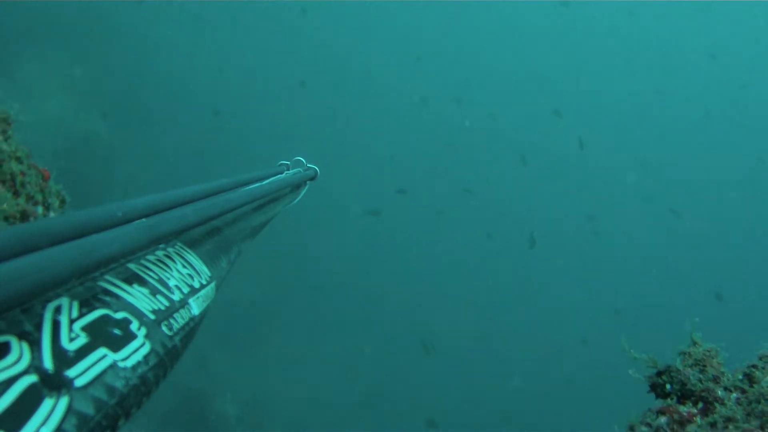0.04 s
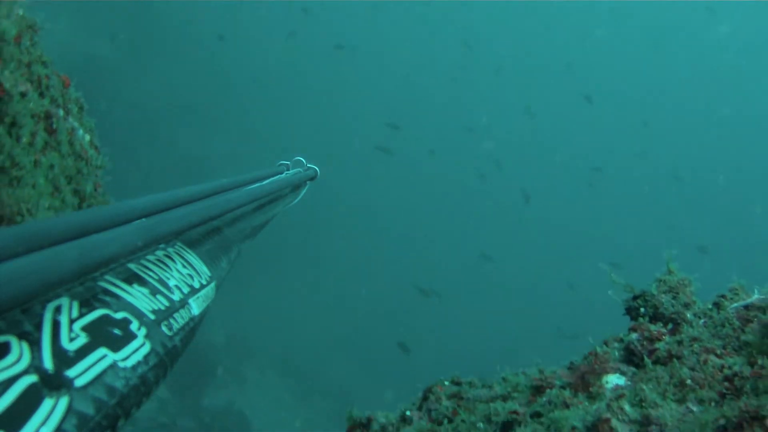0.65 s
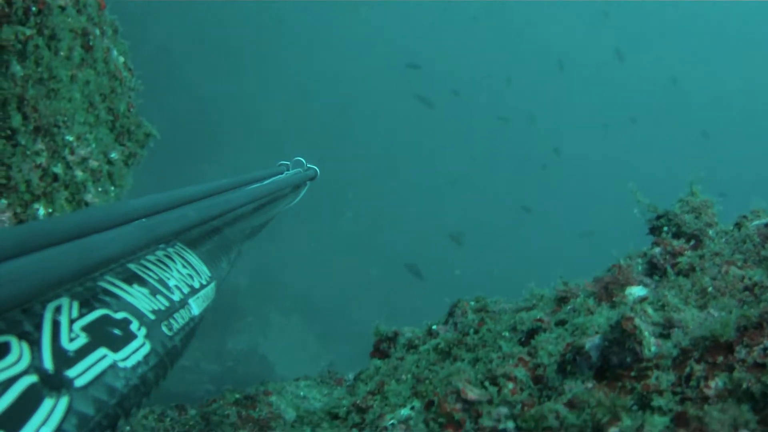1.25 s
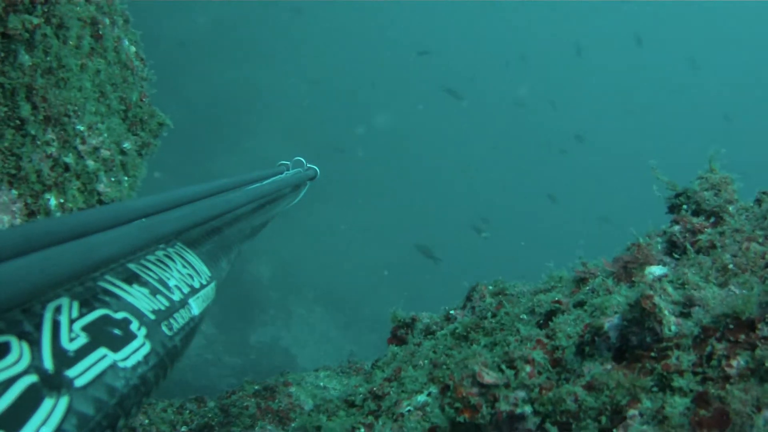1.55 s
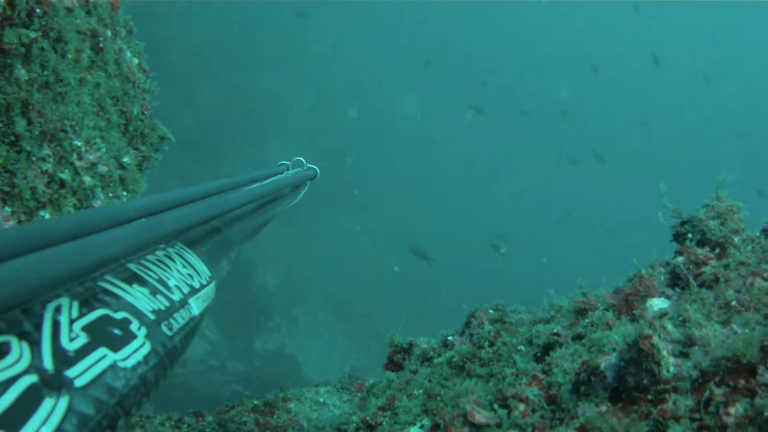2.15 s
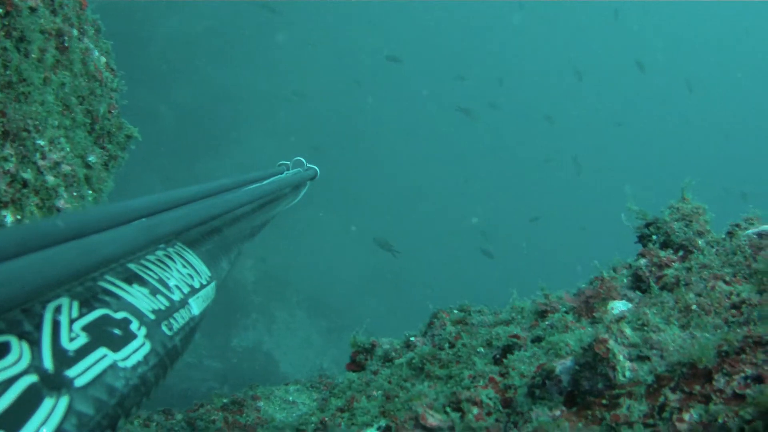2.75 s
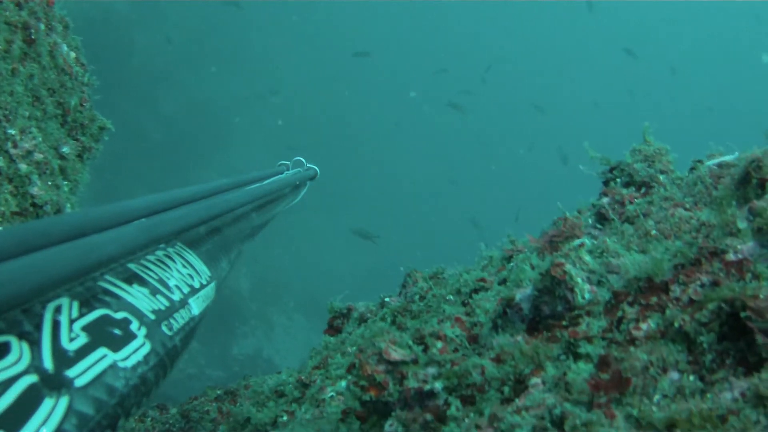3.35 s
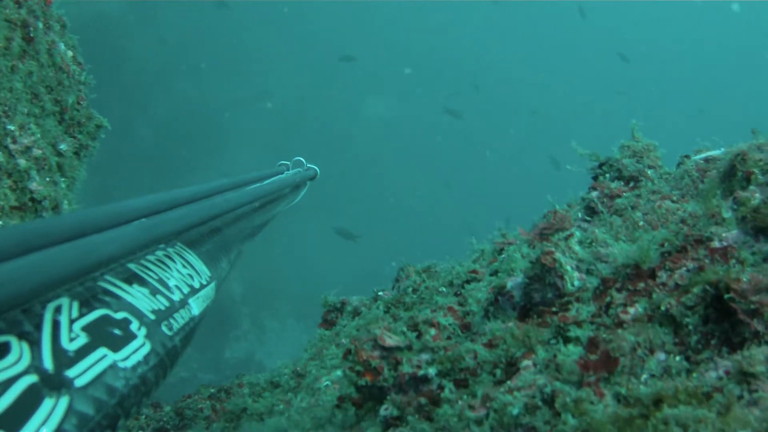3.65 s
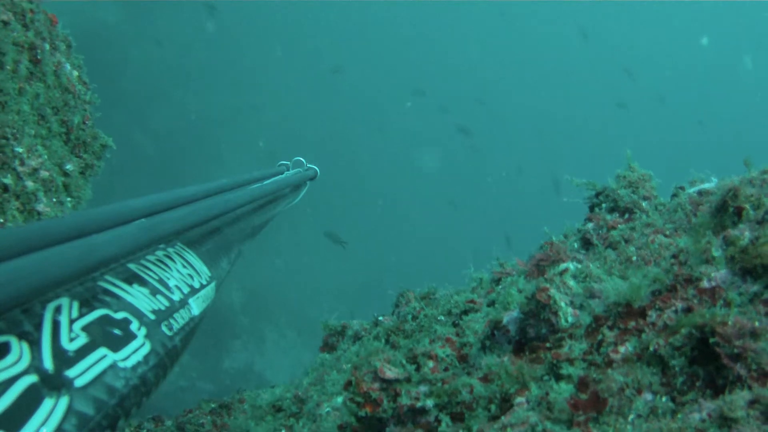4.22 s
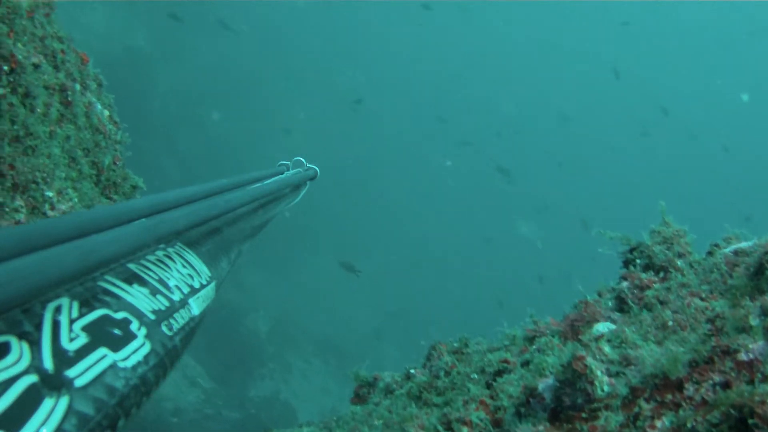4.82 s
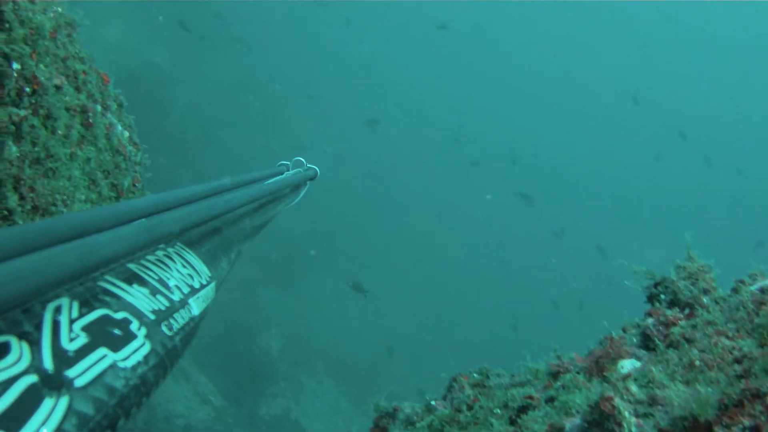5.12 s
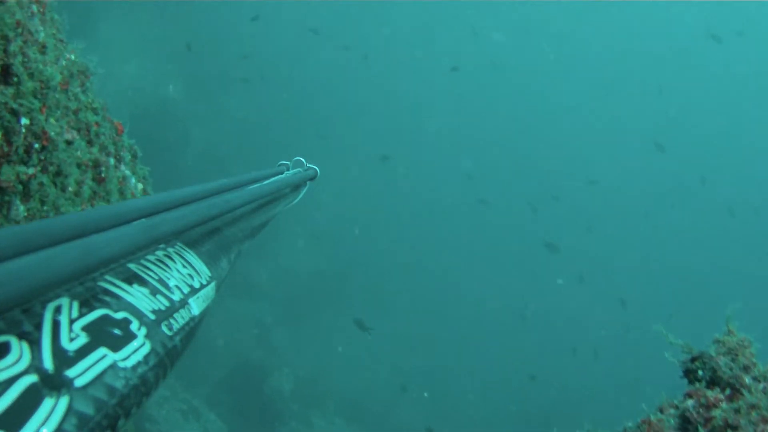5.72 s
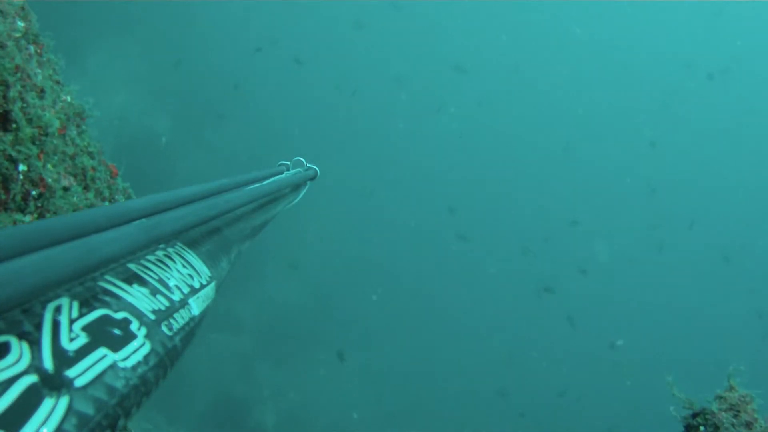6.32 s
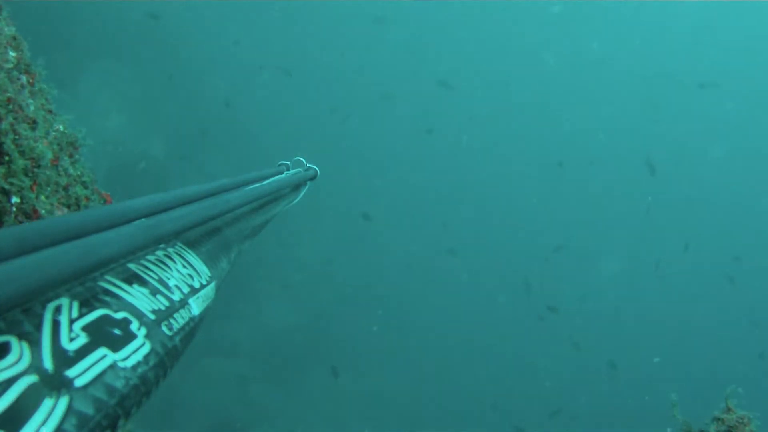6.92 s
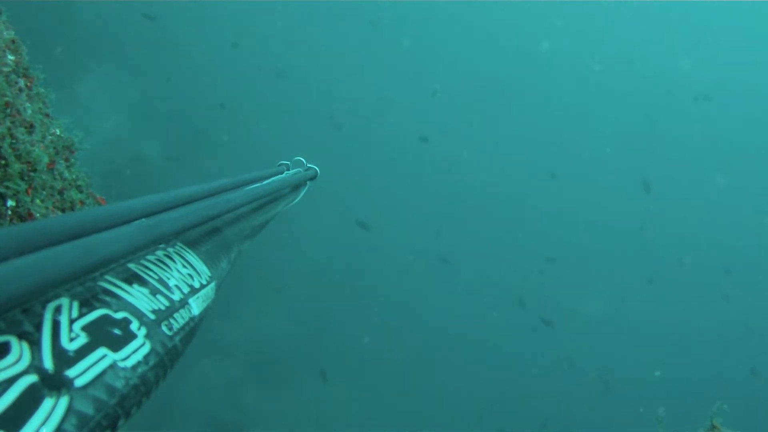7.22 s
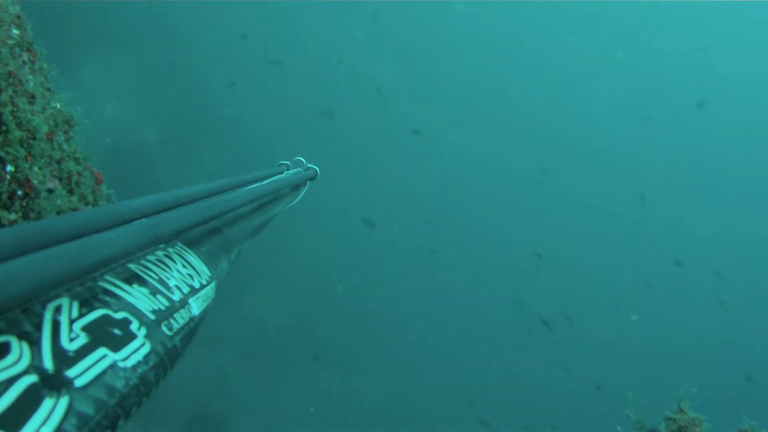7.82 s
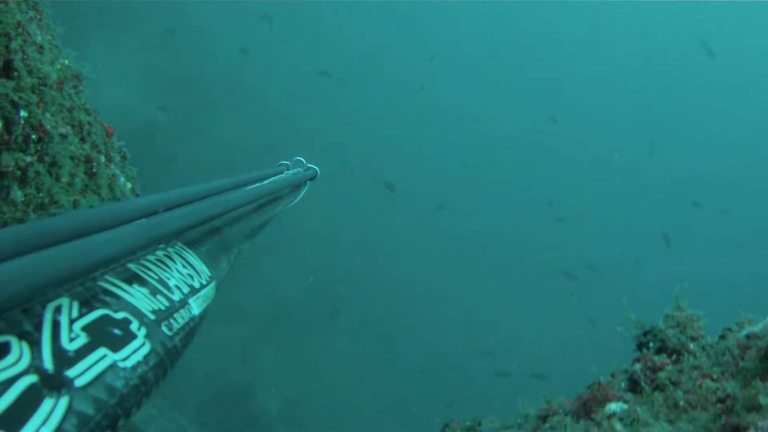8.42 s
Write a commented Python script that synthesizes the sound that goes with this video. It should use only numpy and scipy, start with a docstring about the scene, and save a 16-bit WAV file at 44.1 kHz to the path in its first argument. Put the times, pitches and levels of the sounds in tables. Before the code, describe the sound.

A dense sizzle of distant shrimp runs throughout, heard in the sea through a camera's watertight case. Close snaps click unevenly on top, loudest just after the start and about three seconds in, each ringing the case slightly. Water gurgles softly near the middle and again later, and the case takes a few light, dull knocks. A low sea wash and a barely audible electronic hiss and whine stay behind.

```python
"""Under the sea over a rocky reef, with the microphone inside a camera's watertight housing.
Snapping shrimp crackle near and far: each snap scatters off the rocks and rings the housing.
Water gurgles softly now and then over the low wash of the sea, and the housing takes a few dull bumps.
Behind it all, the camera's electronics hiss and whine."""
import sys
import numpy as np
from scipy import signal
from scipy.fft import rfft, irfft, next_fast_len
from scipy.io import wavfile
from scipy.ndimage import map_coordinates

SR = 44100
rng = np.random.default_rng(int(sys.argv[2]) if len(sys.argv) > 2 else 0)


def master(y):
    """Save y as 16-bit WAV."""
    cut = np.clip(np.atleast_2d(y).T, -1, 1)
    pcm = np.round(cut * 32767)  # scale
    wavfile.write(sys.argv[1], SR, pcm.astype(np.int16))


N = 377496
SNAP_SAMPLES = 4096
REEF_T60 = 0.055  # seconds for a close snap's echoes to fall 60 dB

# The loudest snaps, from shrimp near the housing.
# Each row: time in seconds, then relative level, treble and low ring, all in dB.
NEAR_SNAPS = [(0.3112, -25.5, -7, 4), (0.319, -23.5, 4, 4.5), (0.3408, -25.5, 5.5, 0),
              (0.566, -35, -16, -9), (0.617, -28.5, 2, 4), (0.671, -30.5, 5, 11), (0.827, -33, 11, 0),
              (0.9871, -30, -18, 2), (1.3839, -31.5, 5, -9), (1.464, -33.5, -9, -2), (1.662, -27, 3.5, 2),
              (1.9982, -31.5, 1, 6), (2.0887, -27.5, -27, 8.5), (2.47, -32.5, 9.5, -8),
              (2.794, -31.5, 6, -10), (2.8587, -30.5, -2, 2), (3.0593, -31.5, 1, -18), (3.097, -30, 2, -8),
              (3.128, -32, -24, -8), (3.176, -20.5, -14, 9.5), (3.1887, -31, 5, 4),
              (3.3665, -22.5, -0.5, -3), (3.526, -34.5, -4, -2), (3.64, -31.5, 10, -11),
              (3.686, -31, 3, -12), (3.7446, -27.5, -14, 0), (3.7545, -31, -6, -2), (4.2122, -35.5, 14, -8),
              (4.224, -27.5, -5, -6), (4.529, -28, -7, 4), (4.6638, -30, -6, -3), (4.7023, -30.5, 2, -9),
              (4.8398, -31, 7, 2), (5.246, -31, -23, 5), (5.2931, -29, 4, 8), (6.7334, -25, -3, 1),
              (6.8001, -32, 7, -2), (6.8116, -32, -6, 6), (7.376, -32.5, -5, 4), (7.5282, -30, 6.5, 0),
              (7.943, -31.5, 3, -11), (8.0893, -31.5, 5, -11), (8.309, -28.5, 2, 3.5), (8.3605, -30, 6, -4)]

def near_shrimp(gain_db, treble_db, low_db):
    """Single claw snaps stand out, each with its own path off the rocks and its own colour."""
    track = np.zeros(N)
    attack_s = 0.001817  # each snap has a soft attack, swelling over about 2 ms
    for s, db, own_treble_db, own_low_db in NEAR_SNAPS:
        ring = housing_ring(treble_db + own_treble_db, low_db + own_low_db)
        echo_db = -1 - 2 * rng.standard_normal()  # the rocks' echo changes from place to place
        snap = scattered(snap_power(crack_t60=0.012, echo_db=echo_db, echo_t60=REEF_T60))
        add(track, s - attack_s, at_level(signal.fftconvolve(snap, ring), db + gain_db))
    return track

def snap_power(crack_t60, echo_db, echo_t60):
    """Power over time of one snap: a brief crack, then its echoes from the rocks."""
    t = np.arange(SNAP_SAMPLES) / SR
    crack = t ** 2 * amp(-60 * t / crack_t60) ** 2  # a soft attack, then a fast decay
    echoes = t * amp(-60 * t / echo_t60) ** 2
    return crack / crack.sum() + amp(echo_db) ** 2 * echoes / echoes.sum()

def scattered(power):
    """Sound that comes by many paths is noise with the given power over time."""
    return np.sqrt(np.abs(power)) * rng.standard_normal(len(power))

# Resonances of the housing around the microphone.
# Each row: centre in Hz, width in Hz, relative level in dB.
HOUSING_MODES = [(978.5, 45, -12), (1083, 165, -8), (1245.6, 103, -2), (1363, 23, -12.5),
                 (1563, 153, -0.06), (1699, 222, -3.5), (1888, 108, -8.5), (2204, 213, -12.5),
                 (2400, 267, -12.5), (2628, 210, -16), (3034, 320, -19), (3750, 700, -20), (4570, 530, -27),
                 (5356, 810, -26.5), (6046, 575, -29), (6840, 1040, -37.5)]

def housing_ring(treble_db, low_db):
    """The housing rings after one click; the click's colour tilts the low and high ends."""
    hz = np.fft.rfftfreq(SNAP_SAMPLES, 1 / SR)
    power = sum(amp(db) ** 2 / (1 + (2 * (hz - centre) / width) ** 2) ** 2
                for centre, width, db in HOUSING_MODES)
    colour_db = along([(600, 0), (900, low_db), (1200, low_db), (1550, 0), (1900, 0),
                       (2700, treble_db / 4 - 1), (4200, treble_db)], hz)
    wall_db = along([(7400, -2.5), (8200, -4), (8900, -20), (11000, -13.5)], hz)  # the wall dulls treble
    cepstrum = irfft(np.log(np.sqrt(power) * amp(colour_db + wall_db) + 1e-7))
    causal = np.r_[cepstrum[0], 2 * cepstrum[1:SNAP_SAMPLES // 2]]  # no ring before the click
    return irfft(np.exp(rfft(causal, SNAP_SAMPLES)))

# The clearest ticks of small shrimp close by.
# Each row: start in seconds, relative level in dB, pitch in Hz.
CLOSE_TICKS = [(0.5897, -42, 5500), (1.4405, -43, 5170), (4.611, -44, 5030), (5.177, -38.5, 3600),
               (5.678, -43, 4500), (5.92, -43, 5550), (6.36, -39, 4270), (7.7643, -38.5, 4000),
               (8.163, -43, 3840)]

def small_shrimp(gain_db, width_octaves):
    """Tiny claws give thin, dry ticks, each around its own pitch."""
    track, hz = np.zeros(N), np.fft.rfftfreq(SNAP_SAMPLES, 1 / SR)
    wall = rfft(housing_ring(treble_db=7.5, low_db=-10))
    for s, db, pitch_hz in CLOSE_TICKS:
        snap = scattered(snap_power(crack_t60=0.0082, echo_db=-11, echo_t60=REEF_T60))
        band = np.exp(-(np.log2((hz + 1) / pitch_hz) / width_octaves) ** 2)
        tick = irfft(rfft(snap) * band * wall)[:SNAP_SAMPLES // 2]
        add(track, s, at_level(tick, db + gain_db))
    return track

# The colony farther out on the reef. Each row: time in seconds, relative level in dB.
COLONY_LEVEL = [(0.0, -38), (0.48, -37.5), (0.76, -38.5), (1.29, -38), (1.64, -36), (1.88, -37.5),
                (2.86, -38.5), (2.95, -37.5), (3.19, -37.5), (4.15, -39), (4.62, -37), (7.08, -37.5),
                (7.37, -36.5), (8.1, -39.5), (8.56, -38)]

def colony(far_db, mid_db, small_db, stray_db):
    """Far snaps merge into a sizzle, closer ones crackle, small shrimp tick and stray ticks poke out."""
    level_db = np.interp(np.arange(N) / SR, *np.transpose(COLONY_LEVEL))
    level_db += 0.83 * wobble(per_s=8)  # activity comes and goes by chance
    far = crackle(per_s=1300, spread_db=1.5, crack_t60=0.0027, echo_db=3.5, treble_db=3.5, low_db=3)
    mid = crackle(per_s=110, spread_db=2.5, crack_t60=0.012, echo_db=-4, treble_db=0, low_db=-1)
    small = crackle(per_s=110, spread_db=10, crack_t60=0.0037, echo_db=-5, treble_db=19.5, low_db=-11)
    stray = crackle(per_s=10, spread_db=4, crack_t60=0.0041, echo_db=-7.5, treble_db=18.5, low_db=-7)
    distant = amp(level_db) * (amp(far_db) * far + amp(mid_db) * mid)
    return distant + amp(small_db) * small + amp(stray_db) * stray

def crackle(per_s, spread_db, crack_t60, echo_db, treble_db, low_db):
    """Snaps at random times ring the housing; their sum has rms 1."""
    fired = rng.random(N) < per_s / SR
    sizes = amp(spread_db * np.minimum(rng.standard_normal(N), 1))  # none of them is very near
    power = signal.oaconvolve(fired * sizes ** 2, snap_power(crack_t60, echo_db, echo_t60=0.097))[:N]
    return unit(signal.oaconvolve(scattered(power), housing_ring(treble_db, low_db))[:N])

# Dull bumps on the housing itself. Each row: middle in seconds, relative peak in dB, pitch in Hz.
HOUSING_BUMPS = [(1.6982, -42, 220), (3.11, -57, 172), (4.9464, -50, 190), (7.335, -55, 160)]

def bumps(gain_db):
    """A bump pushes the housing once to and fro, with no ring."""
    track, t = np.zeros(N), np.arange(N) / SR
    for s, db, hz in HOUSING_BUMPS:
        phase = 2 * np.pi * hz * (t - s)
        track += amp(db + gain_db) * phase * np.exp((1 - phase ** 2) / 2)
    return track

# Water stirring right at the housing.
# Each row: middle in seconds, relative level in dB, pitch in Hz, length in seconds.
WATER_STIRS = [(1.499, -61.5, 218, 0.13), (3.767, -51, 518, 0.1), (3.961, -54.5, 469, 0.27),
               (4.153, -54, 377, .17), (4.421, -62.5, 367, 0.26), (6.982, -54.5, 437, 0.14)]

def gurgles(gain_db, ring_cycles, pitch_spread, bubbles):
    """Each stir of the water is a cluster of short, rising bubble notes."""
    track, t = np.zeros(N), np.arange(SNAP_SAMPLES) / SR
    for s, db, pitch_hz, length in WATER_STIRS:
        cluster = np.zeros(N)
        for place, detune in zip(np.linspace(-.5, .5, bubbles), rng.standard_normal(bubbles)):
            hz = pitch_hz * np.exp(pitch_spread * detune)
            age = t * hz / ring_cycles
            rise = 1 + 0.035 * np.minimum(age, 4)
            note = age * np.exp(-2 * age) * np.sin(2 * np.pi * hz * t * rise)
            add(cluster, s - .008 + length * (place + rng.normal(0, 0.1)), note)
        track += amp(db + gain_db) * unit(cluster) * np.sqrt(length * SR / N)
    return track

# The sea all around the housing. Each row: frequency in Hz, relative level in dB.
SEA_SPECTRUM = [(10, -14), (29, -6.5), (42, -11), (60, -8.5), (85, -13), (120, -13.5), (230, -7.5),
                (310, -6), (400, -3.5), (800, -1), (1100, -6.5), (2500, -61)]

def sea_wash(level_db):
    """The sea gives a low, steady wash of noise."""
    return amp(level_db) * noise(SEA_SPECTRUM)

# Hiss from the camera itself. Each row: frequency in Hz, relative level in dB.
HISS_SPECTRUM = [(8900, -49.5), (9500, -15.5), (10900, -7), (13000, -2), (15200, 1), (16000, -39)]

def electronics(hiss_db, whine_db, whine_hz):
    """The camera's circuits add a high hiss and a thin, steady whine."""
    whine = np.sqrt(2) * np.sin(2 * np.pi * whine_hz * np.arange(N) / SR)
    return amp(hiss_db) * noise(HISS_SPECTRUM) + amp(whine_db) * whine

def amp(db):
    """Decibels to gain."""
    return 10 ** (np.asarray(db) / 20)

def unit(x):
    """Scale to rms 1."""
    return x / np.sqrt(np.mean(x ** 2) + 1e-20)

def at_level(sound, db):
    """Scale a snap so that its first 8 ms have this rms level."""
    head = sound[:round(.008 * SR)]
    return amp(db) * sound / np.sqrt(np.mean(head ** 2))

def along(points, hz):
    """Read (Hz, value) points on a log axis."""
    point_hz, values = np.transpose(points)
    return np.interp(np.log(hz + 1), np.log(point_hz + 1), values)

def filtered(x, response):
    """Filter x by a gain that depends on frequency."""
    size = next_fast_len(N + SR // 4)
    return irfft(rfft(x, size) * response(np.fft.rfftfreq(size, 1 / SR)), size)[:N]

def noise(spectrum):
    """Noise of rms 1 with the given colour."""
    return unit(filtered(rng.standard_normal(N), lambda hz: amp(along(spectrum, hz))))

def wobble(per_s):
    """A smooth random curve with per_s knots a second."""
    knots = rng.standard_normal(int(N * per_s / SR) + 4)
    return map_coordinates(knots, [np.arange(N) * per_s / SR])

def add(track, s, sound):
    """Mix a sound into the track from s seconds on."""
    start = int(np.clip(round(s * SR), 0, N))
    track[start:start + len(sound)] += sound[:N - start]

def scene():
    """Shrimp over the low wash of the sea, with the camera's own small noises."""
    shrimp = near_shrimp(gain_db=-0.62, treble_db=-3.5, low_db=-6.5)
    shrimp += small_shrimp(gain_db=0.5, width_octaves=0.87)
    shrimp += colony(far_db=-1.5, mid_db=-3, small_db=-53.5, stray_db=-58.5)
    water = sea_wash(level_db=-58) + gurgles(gain_db=-2.2, ring_cycles=4.1, pitch_spread=0.163, bubbles=48)
    camera = bumps(gain_db=2.5) + electronics(hiss_db=-69.5, whine_db=-72.5, whine_hz=7867)
    return (shrimp + water + camera)[None]

def record(dry):
    """The camera takes one channel and keeps nothing above its band limit."""
    return filtered(dry[0], lambda hz: hz < 15350)[None]

dry = scene()
out = record(dry)
master(out)
```